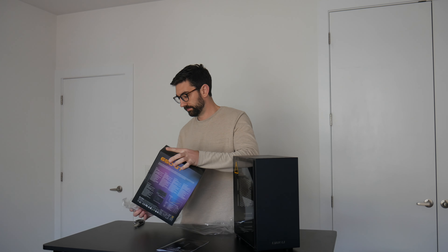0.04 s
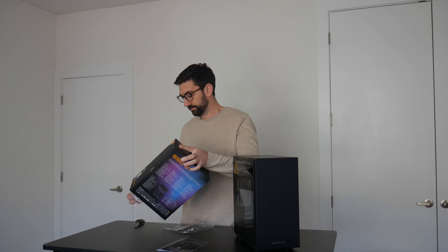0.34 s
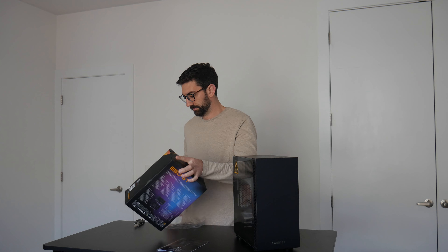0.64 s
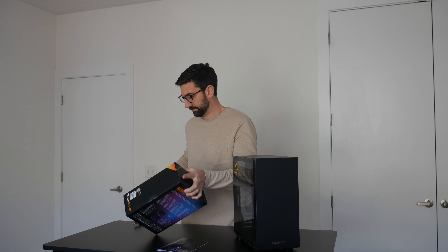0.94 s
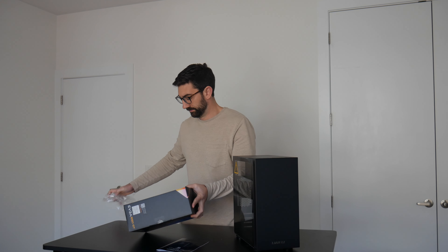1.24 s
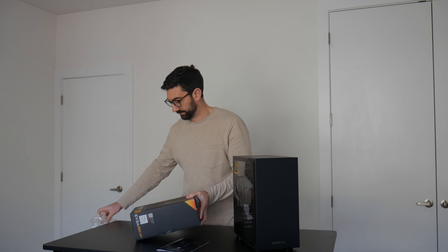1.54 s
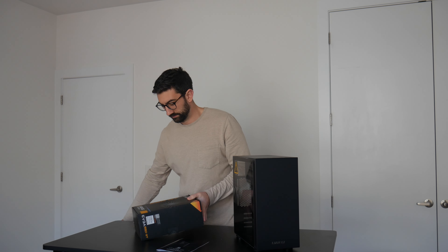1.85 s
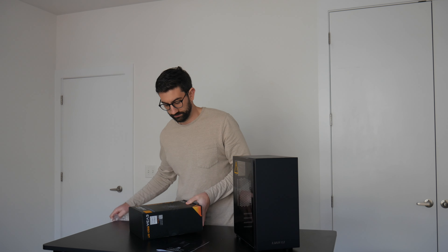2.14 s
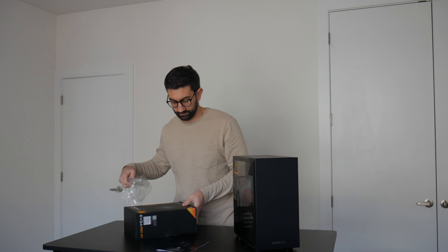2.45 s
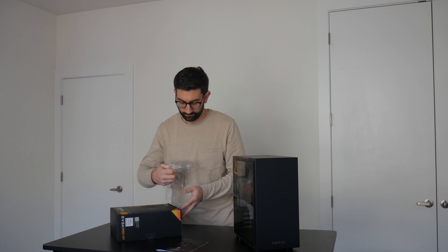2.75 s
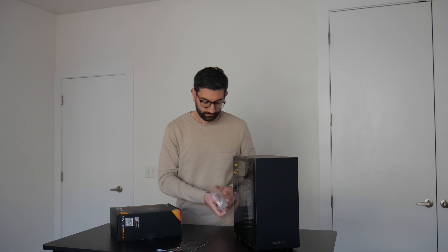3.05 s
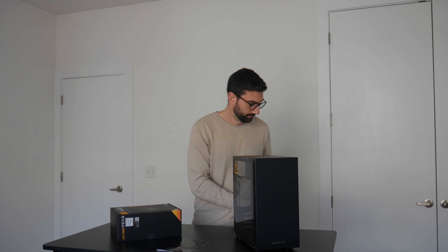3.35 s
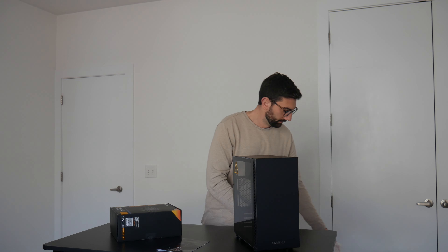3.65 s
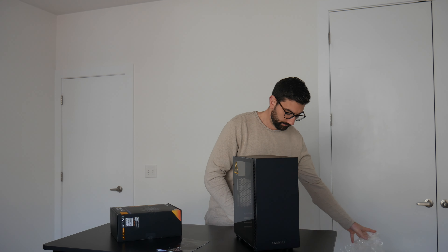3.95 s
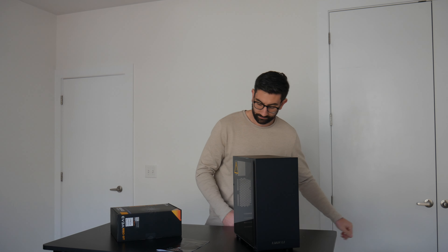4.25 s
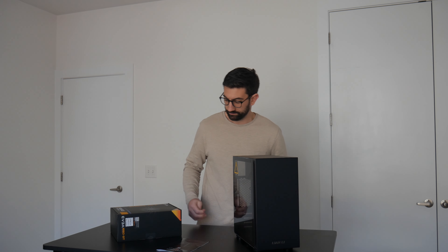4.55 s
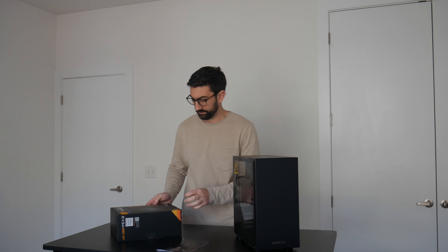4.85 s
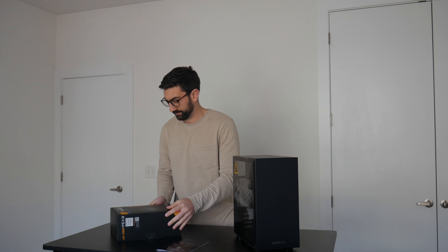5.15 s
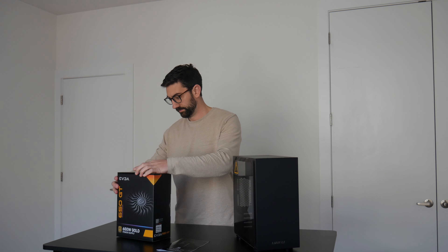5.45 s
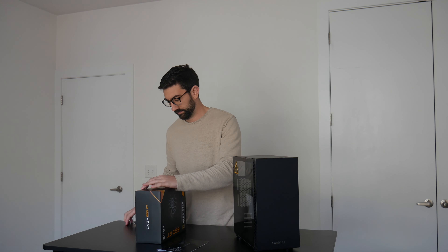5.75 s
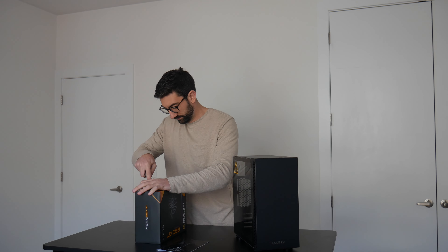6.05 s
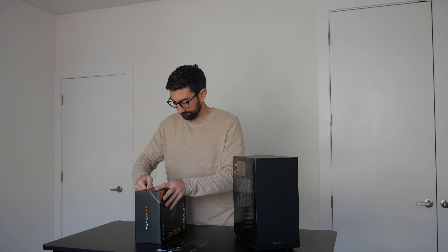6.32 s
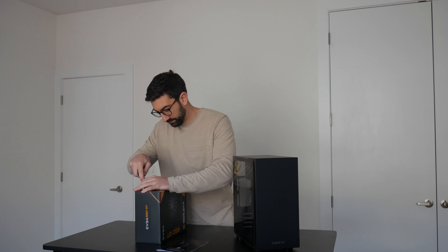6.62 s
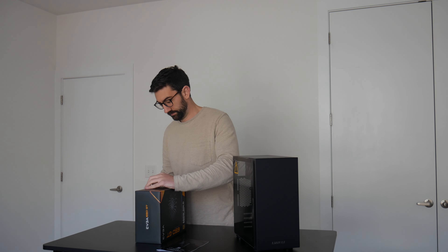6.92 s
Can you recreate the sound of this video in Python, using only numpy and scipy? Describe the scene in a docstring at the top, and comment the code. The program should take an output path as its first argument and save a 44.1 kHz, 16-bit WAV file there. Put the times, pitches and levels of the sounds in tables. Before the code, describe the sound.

From the start, thin plastic wrap rustles in repeated hissy pulls, strongest just before 1 second, while a cardboard box slides out with a low, hollow rubbing. At about 2.2 seconds the box skids on a desk for half a second, with a brief squeaky groan. The wrap is crumpled, loudest near 2.9 seconds, then dies down in softer rustles until about 5 seconds, when the box slides softly again. A low room rumble lies under all this. At 5.2 seconds rustle and rumble stop abruptly and the sound becomes thin and dry. Cardboard clicks and scrapes as the box is tipped upright, landing with a light knock and a snap around 5.7 seconds. From 6 seconds to just past 7, fingers pick at the lid with quick, irregular light clicks and short scratches. A faint steady room hiss runs throughout.

```python
"""Plastic wrap rustles as a cardboard box is slid out and laid on a desk; it is crumpled and put aside.
The film's many creases merge into a hiss, while sliding friction excites the air in the hollow box
to a drone and stick-slip on the desk rings its panels. Then the sound turns thin and dry: the box is
tipped upright with a light knock, and its lid is picked at and scraped in quick light clicks.
A low room rumble lies under the unwrapping, and a faint hiss under the whole."""
import sys
import numpy as np
from scipy import signal
from scipy.fft import rfft, irfft
from scipy.io import wavfile
from scipy.ndimage import uniform_filter1d

SR = 44100
rng = np.random.default_rng(int(sys.argv[2]) if len(sys.argv) > 2 else 0)


def pcm_store(signal):
    """Save signal as 16-bit PCM."""
    levels = np.round(np.clip(np.atleast_2d(signal), -1, 1) * 32767)
    wavfile.write(sys.argv[1], SR, levels.astype(np.int16).T)


N = 312228
TIME = np.arange(N) / SR
FULL_BAND_HZ = (0, 22050)

# Pulls and squeezes of the film. Each row: start in seconds, relative level in dB, hold in seconds,
# fade in dB per second, top-octave lift in dB, midrange lift in dB.
FILM_PULLS = [(-.04, -36, 0.039, 62, 7, -1.5), (0.026, -34.5, 0.0023, 17, -1, -3.5),
              (0.334, -35.5, 0.038, 66, -0.5, -4), (0.497, -39.5, 0.062, 45, 2, 4.5),
              (0.639, -32.5, 0.16, 40, -1, 3), (0.784, -31.5, .29, 35.5, -2.5, 0),
              (1.379, -35.5, 0, 43, 0.5, -2), (1.531, -35.5, 0, 51.5, 1.5, -1.5),
              (1.915, -40, 0.04, 13, 3, -3.5), (2.201, -32.5, 0.029, 75, 0, 2),
              (2.51, -45.5, 0.11, 64, 12, 10), (2.838, -27.5, 0.037, 25.5, -2.5, 1.5),
              (3.185, -33, 0.18, 19, -0.5, .5), (3.846, -39.5, 0.098, 86, 5, -2),
              (4.14, -44.5, 0.035, 17, 6, -6.5), (4.52, -47.5, 0.0041, 61.5, 1.5, 3),
              (4.822, -54.5, 0.29, 45, -7, 9.5)]
# Spectrum of the film. Each row: frequency in Hz, relative level in dB.
FILM_SPECTRUM = [(350, -21), (600, 0), (1040, -1), (1310, -0.93), (4220, -1), (7210, -1), (10000, -5),
                 (14500, -20.5), (15400, -28), (16000, -62)]
# Slides of hands and film over the box. Each row: start in seconds, relative level in dB,
# hold in seconds, cavity resonance in Hz.
BOX_SLIDES = [(0.212, -42, 0.0054, 407), (0.63, -43, 0.18, 320), (0.91, -36, 0.028, 254),
              (1.12, -44, 0.15, 360), (1.226, -42, 0.048, 272), (1.345, -38.5, 0.094, 238),
              (1.59, -39, 0.022, 245), (2.19, -36, 0.078, 450), (2.858, -35.5, 0.088, 427),
              (3.106, -42.5, 0.02, 420), (3.36, -41.5, 0.018, 330), (4.844, -49.5, 0.11, 368),
              (5.03, -43, .15, 310)]
# Spectrum of the handled box. Each row: frequency in Hz, relative level in dB.
BOX_SPECTRUM = [(100, -39), (170, -12), (230, 2.5), (330, -3.5), (430, 1), (570, -0.5), (700, -14.5),
                (1000, -48)]
WALL_MODES_HZ = [270, 362, 430, 530]
# Envelope of the skid on the desk. Each row: time in seconds, relative level in dB.
SKID_ENVELOPE = [(2.16, -60), (2.19, -39), (2.222, -44), (2.24, -32), (2.31, -31), (2.39, -40),
                 (2.5, -37.5), (2.701, -48.5)]
# Resonances of the panels. Each row: frequency in Hz, nominal width in Hz, relative level in dB.
PANEL_MODES = [(541, 56, 2.5), (446, 19, -1), (725, 30, -10), (910, 65, -6.5), (1103, 25, -7)]
# Notes sung as the box's edge catches. Each row: start in seconds, relative level in dB,
# hold in seconds, pitch in Hz.
EDGE_GROANS = [(2.172, -42.5, 0.099, 876), (2.237, -32.5, 0.067, 514), (2.46, -41, .05, 312)]
# Clicks of card and lid. Each row: start in seconds, relative level in dB, ring pitch in Hz,
# then ring, upper mids and treble in dB against that level, rise in seconds.
LID_CLICKS = [(5.274, -29.5, 4280, -11, 2, -10, 0.00094), (5.3168, -29, 3340, -3, -6, -1.5, 0.00045),
              (5.698, -26, 2800, -8, -4, -13, 0.0076), (5.787, -34, 3370, 1.5, -0.5, -7.5, 0.0063),
              (6.061, -28, 2490, 0.5, -6, -7, 0.003), (6.176, -34, 1790, -6, -7, -12, 0.002),
              (6.1928, -26.5, 3070, -3, 1, 0.5, 0.001), (6.2195, -37, 3200, 2, 2, -2, 0.00039),
              (6.277, -46.5, 4570, -3, -2, -11, 0.0036), (6.363, -40.5, 4480, -6, -3.5, -8.5, 0.0032),
              (6.433, -40, 2900, 1, -2.5, -2.5, 0.012), (6.493, -47, 1460, -3, -9, -10, 0.0031),
              (6.5665, -40, 2450, -2, -3.5, -2.5, 0.0026), (6.674, -35.5, 2620, -9, -3, -6.5, 0.0021),
              (6.787, -31, 2040, -12, -14, -12, 0.0004), (6.809, -34, 3250, -6, -10, -8, 0.0013),
              (6.947, -50.5, 2210, -3, -3.5, -4, 0.0019), (7.0704, -37.5, 1820, -12, -15, -14, 0.0029)]
# Spectrum of a click. Each row: frequency in Hz, relative level in dB.
CLICK_SPECTRUM = [(100, -34.5), (700, -33.5), (1050, -16), (1350, -16), (1800, -3.5), (3000, -0.5),
                  (6000, -3), (8000, -6), (11000, -8), (15500, -16.5)]
# Main, upper-mid and treble bands of a click. Each row: lower edge in Hz, upper edge in Hz.
CLICK_BANDS_HZ = [(1500, 3800), (3800, 7000), (7000, 15000)]
# Resonances of the card. Each row: frequency in Hz, width in Hz, lift in dB.
CARD_MODES = [(1840, 58, 7), (2040, 33, 5.6), (2030, 10, 6.2), (2460, 44, 6.8), (3150, 70, 4.5),
              (4370, 280, 2), (5650, 200, 2)]
# Finger strokes on the card. Each row: start in seconds, level in dB, rise in seconds, hold in seconds.
FINGER_STROKES = [(5.178, -42.5, 0.028, 0.025), (5.23, -36, 0.028, 0), (5.323, -31.5, 0.033, 0.0044),
                  (5.35, -52, 0.061, 0.81), (5.515, -47, 0.0039, 0), (5.622, -35.5, 0.046, 0.038),
                  (6.008, -45, .003, 0), (6.097, -42.5, 0.008, 0.00099), (6.41, -44, 0.022, 0.015),
                  (6.605, -47, 0.006, 0), (6.663, -35.5, 0.016, 0.0069), (6.714, -37, 0.0037, 0.043),
                  (6.733, -35.5, 0.005, 0.038), (6.78, -40.5, 0.014, 0.011)]
# Spectra of a light touch and a firm scrape. Each row: frequency in Hz, relative level in dB.
TOUCH_SPECTRUM = [(170, -29), (330, -21), (450, -26), (900, -18), (1400, -17.5), (2300, -8.5), (3500, -11),
                  (6000, -14.5), (16000, -22.5)]
SCRAPE_SPECTRUM = [(400, -30), (550, -17), (780, -40), (1000, -13), (1400, -19), (1800, -9.5), (4500, -8.5),
                   (7000, -11), (13000, -11), (16000, -14)]
# The box landing on its end. One row: level in dB, pitch in Hz, time to decay by 60 dB in seconds.
LANDING_KNOCK = (-46.5, 570, .09)
# Envelopes of the room's rumble and deep hum. Each row: time in seconds, relative level in dB.
RUMBLE_ENVELOPE = [(.5, -60.5), (.9, -57), (2.75, -58.5), (2.95, -56.5), (3.7, -59.5), (5.18, -60.5)]
HUM_ENVELOPE = [(0, -69), (2.3, -62), (2.8, -70), (3.0, -71)]
# Spectra of the room's rumble and hiss. Each row: frequency in Hz, relative level in dB.
RUMBLE_SPECTRUM = [(20, -45), (50, -7), (90, -7), (135, 9.5), (175, 1.5), (260, -13), (500, -29)]
AIR_SPECTRUM = [(100, -27), (400, -22), (580, -13.5), (1000, -0.5), (2200, -2), (3500, -2), (5500, -15),
                (16000, -22.5)]
# Resonances of the room. Each row: frequency in Hz, width in Hz, lift in dB.
ROOM_MODES = [(345, 30, 9), (520, 35, 6.5), (697, 27, 9.5), (1220, 46, 1), (2240, 110, 5.5)]
# Stereo images, broad and compact. Each row: frequency in Hz, left-right correlation.
WIDE_IMAGE = [(60, 0.41), (270, 0.9), (700, 0.7), (1500, 0.67), (3000, 0.65), (4300, 0.99), (8000, 1),
              (11000, 0.33)]
NARROW_IMAGE = [(100, 0.41), (500, 0.81), (1300, 0.93), (2500, 0.99), (5500, 0.87), (8000, 0.74)]


def film_rustle(trim_db=0.24, flutter_db=0.52, taut_db=-35.5, top_loss=0.46, middle_gain=0.38):
    """Superposition: countless creases of thin film merge into a hiss that dulls as each pull slackens."""
    def colour(hz, t):
        power = pull_powers(t)
        slack_db = np.clip(taut_db - total_db(power), -20, 20)  # slack trades top octave for midrange
        *_, top_db, middle_db = np.transpose(FILM_PULLS)
        top = blend(power, top_db) - top_loss * slack_db
        middle = blend(power, middle_db) + middle_gain * slack_db
        top_weight = at_hz([(6000, 0.16), (11000, 0.85)], hz)
        middle_weight = at_hz([(1600, 0.82), (5000, 0.19)], hz)
        return gain_of(at_hz(FILM_SPECTRUM, hz) + top * top_weight + middle * middle_weight)
    flutter = smooth_noise(N, 500, 300)
    creases = stereo(grains(per_s=4000, size_db=3.0, share=0.18), WIDE_IMAGE)
    creases = early_echoes(creases, echo_db=-10.5, reach_s=.014)
    hiss = shaped(creases, colour, band_hz=(2500, 9000))
    return hiss * gain_of(envelope_db(pull_powers) + trim_db + flutter_db * flutter)


def pull_powers(t):
    """Power envelope of each pull: it snatches the film at part strength, then swells to the full."""
    return np.array([gesture(t, start, db, 0.052, hold, fade, snatch=0.24)
                     for start, db, hold, fade, _, _ in FILM_PULLS])


def box_drone(ring_db=12, width_hz=42, murmur_hz=318, skid_dip_db=6):
    """Cavity resonance: sliding drives the air in the box, at a new pitch for each slide as it turns."""
    pitches = [row[-1] for row in BOX_SLIDES] + [murmur_hz]
    def colour(hz, t):
        pitch = blend(slide_powers(t), pitches)
        cavity = gain_of(ring_db) * (min(pitches) / pitch) ** 2  # the deepest notes ring best
        walls_db = 5 * sum(resonance(hz, mode, width_hz=30) for mode in WALL_MODES_HZ)
        body = gain_of(at_hz(BOX_SPECTRUM, hz) + walls_db)
        return body * (1 + cavity * resonance(hz, pitch, width_hz))
    drone = shaped(stereo_noise(WIDE_IMAGE), colour, band_hz=(190, 620), size=2048)
    peak_db = max(db for _, db in SKID_ENVELOPE)
    skid_share = gain_of(at_time(SKID_ENVELOPE, TIME) - peak_db)  # the drone dips while the box skids
    return steady(drone) * gain_of(envelope_db(slide_powers) - skid_dip_db * skid_share)


def slide_powers(t, murmur_db=-48.5):
    """Power envelope of each slide over the box, and last the constant murmur of light handling."""
    moves = [gesture(t, start, db, 0.043, hold, fade_db_per_s=103) for start, db, hold, _ in BOX_SLIDES]
    return np.array(moves + [np.full(len(t), gain_of(murmur_db) ** 2)])


def desk_skid(glide_per_db=0.0042):
    """Stick-slip friction on the desk rings the panel modes, which rise in pitch as the skid slows."""
    peak_s, peak_db = max(SKID_ENVELOPE, key=lambda row: row[1])
    def colour(hz, t):
        glide = 1 + glide_per_db * (peak_db - at_time(SKID_ENVELOPE, np.maximum(t, peak_s)))
        return sum(gain_of(db) * resonance(hz, mode * glide, 2 * width) for mode, width, db in PANEL_MODES)
    panels = steady(shaped(stereo_noise(NARROW_IMAGE), colour, size=4096))
    skidding = (TIME > SKID_ENVELOPE[0][0]) & (TIME < SKID_ENVELOPE[-1][0])
    return panels * gain_of(at_time(SKID_ENVELOPE, TIME)) * skidding


def edge_groans(waver=0.0144):
    """Mode locking: where the slips fall into step with one panel, it sings a short wavering note."""
    out = np.zeros(N)
    for start, level_db, hold, hz in EDGE_GROANS:
        note = sine(hz * (1 + waver * smooth_noise(N, 500)))
        out += note * np.sqrt(gesture(TIME, start, level_db, 0.018, hold, fade_db_per_s=127))
    return out


def card_snap(level_db, ring_hz, ring_db, upper_db, treble_db, rise_s, size=16384):
    """Impulse response of snapped card: a crack, a flurry of reflections, a ring and a faint room tail."""
    t, hz = np.arange(size) / SR, np.fft.rfftfreq(size, 1 / SR)
    flurry_t60, tail_t60, ring_t60 = 0.12, 0.14, 0.061  # seconds to fall by 60 dB
    attack = np.minimum(t / rise_s, 1) ** 0.7
    age = np.maximum(t - rise_s, 0)
    fade = gain_of(-60 * age / flurry_t60) + gain_of(-31 - 60 * age / tail_t60)
    burst = rng.standard_normal((2, size)) * fade * attack
    burst[0, round(rise_s * SR)] += 1  # the crack
    burst /= np.sqrt(np.mean(burst[0, t < .02] ** 2))
    ripple_db = 2 * smooth_noise(len(hz), 90, 60)  # every spot of the card has its own broad resonances
    # a strong ring leaves a valley just above its pitch
    valley_db = 9 * gain_of(ring_db) ** 2 * resonance(hz, 1.27 * ring_hz, 0.17 * ring_hz)
    colour_db = at_hz(CLICK_SPECTRUM, hz) + modes_db(CARD_MODES, hz) + ripple_db - valley_db
    # each snap has its own share of upper mids and treble
    power = gain_of(colour_db) ** 2 / len(hz)
    band_db = np.array([10 * np.log10(power[(hz > lo) & (hz < hi)].sum()) for lo, hi in CLICK_BANDS_HZ])
    main, upper, treble = level_db + np.array([-1.5, upper_db, treble_db]) - band_db
    colour_db += at_hz([(3300, main), (4400, upper), (6300, upper), (7600, treble)], hz)
    log_gain = np.log(gain_of(np.concatenate([colour_db, colour_db[-2:0:-1]])))
    minimum_phase = np.exp(np.conj(signal.hilbert(log_gain)))[:len(hz)]
    ring = 2 * np.sin(2 * np.pi * ring_hz * t) * attack * gain_of(level_db + ring_db - 60 * age / ring_t60)
    return stereo(irfft(rfft(burst) * minimum_phase), NARROW_IMAGE) + ring


def lid_clicks(trim_db=-.5):
    """Impulsive excitation: each pick at the box and its lid sets off one snap."""
    out = np.zeros((2, N))
    for start_s, *settings in LID_CLICKS:
        first = round(start_s * SR)
        snap = card_snap(*settings)[:, :N - first]
        out[:, first:first + snap.shape[1]] += snap
    return out * gain_of(trim_db)


def finger_scrapes(light_db=-49, firm_db=-37):
    """Friction noise on card brightens with pressure; light touches carry more of the room's ring."""
    def colour(hz, t):
        firm = np.clip((total_db(stroke_powers(t)) - light_db) / (firm_db - light_db), 0, 1)
        touch_db = (1.5 - firm) * (at_hz(TOUCH_SPECTRUM, hz) + modes_db(ROOM_MODES, hz))
        scrape_db = firm * at_hz(SCRAPE_SPECTRUM, hz)
        return gain_of(touch_db + scrape_db + 0.38 * modes_db(CARD_MODES, hz))
    slips = stereo(grains(per_s=900, size_db=6.5, share=0.52), NARROW_IMAGE)
    slips = early_echoes(slips, echo_db=3, reach_s=.012)
    return shaped(slips, colour, size=1024) * gain_of(envelope_db(stroke_powers))


def stroke_powers(t):
    """Power envelope of each finger stroke."""
    return np.array([gesture(t, *row, fade_db_per_s=271) for row in FINGER_STROKES])


def landing_knock(start_s=5.706, rise_s=0.0022, width_hz=130):
    """Damped resonance: the box lands on its end with a light hollow knock."""
    level_db, pitch_hz, t60 = LANDING_KNOCK
    knock = shaped(stereo_noise(NARROW_IMAGE), lambda hz, t: resonance(hz, pitch_hz, width_hz))
    age = np.maximum(TIME - start_s, 0)
    return knock * gain_of(level_db - 60 * age / t60) * np.minimum(age / rise_s, 1)


def room_rumble(hum_hz=73, waver_hz=2):
    """Low-frequency noise makes the room's boom; slight frequency modulation makes a deep hum waver."""
    boom = shaped(stereo_noise(WIDE_IMAGE), lambda hz, t: gain_of(at_hz(RUMBLE_SPECTRUM, hz)), size=4096)
    hum = sine(hum_hz + waver_hz * smooth_noise(N, 6000))
    return boom * gain_of(at_time(RUMBLE_ENVELOPE, TIME)) + hum * gain_of(at_time(HUM_ENVELOPE, TIME))


def room_air(level_db=-55.5):
    """Room modes colour a faint steady hiss."""
    def colour(hz, t):
        return gain_of(at_hz(AIR_SPECTRUM, hz) + modes_db(ROOM_MODES, hz))
    return shaped(stereo_noise(NARROW_IMAGE), colour, size=4096) * gain_of(level_db)


def early_echoes(x, echo_db, reach_s, count=12):
    """Comb filtering: early reflections from desk, walls and door interfere with the direct sound."""
    delay, polarity = rng.random((2, count))
    lags = ((.001 + reach_s * delay) * SR).astype(int)
    taps = np.zeros(4096)
    taps[0] = 1
    taps[lags] = np.sign(polarity - .5) * gain_of(echo_db) / np.sqrt(count)
    return signal.oaconvolve(x, taps[None] / np.linalg.norm(taps), axes=1)[:, :N]


def grains(per_s, size_db, share):
    """Shot noise: tiny slips of uneven size carry a share of the power, a dense hiss the rest."""
    onsets = rng.random(N) < per_s / SR
    sizes = gain_of(size_db * np.minimum(rng.exponential(1, N), 4))
    slips = unit_rms(onsets * sizes * rng.choice([-1, 1], (2, N)))
    return np.sqrt(share) * slips + np.sqrt(1 - share) * rng.standard_normal((2, N))


def gesture(t, start, level_db, rise, hold, fade_db_per_s, snatch=0):
    """Power of one movement of the hand: a swell, a hold, then exponential decay."""
    age = t - start
    swell = (age > 0) * (snatch + (1 - snatch) * np.minimum(age / rise, 1))
    return (swell * gain_of(level_db - fade_db_per_s * np.maximum(age - rise - hold, 0))) ** 2


def total_db(powers):
    """Incoherent addition: overlapping movements sum in power."""
    return 10 * np.log10(np.sum(powers, axis=0) + 1e-14)


def envelope_db(powers_at):
    """Summed level of a set of movements, interpolated to every sample."""
    t = TIME[::32]
    return np.interp(TIME, t, total_db(powers_at(t)))


def blend(powers, values):
    """Power-weighted mean of a property of overlapping movements."""
    return np.asarray(values) @ powers / (powers.sum(0) + 1e-20)


def shaped(x, colour, band_hz=FULL_BAND_HZ, size=512):
    """Time-varying filter with gain colour(Hz, s), normalised to unit power inside the band."""
    frames = dict(fs=SR, nperseg=size, noverlap=size * 3 // 4)
    hz, t, spectra = signal.stft(x, **frames)
    gain = colour(hz[:, None], t) * np.ones(len(t))
    inside = (hz >= band_hz[0]) & (hz <= band_hz[1])
    gain /= np.sqrt((gain[inside] ** 2).sum(0) / len(hz) + 1e-20)
    return signal.istft(spectra * gain, **frames)[1][:, :N]


def resonance(hz, centre_hz, width_hz):
    """Lorentzian curve of one resonance, 1 at its centre."""
    return 1 / (1 + (2 * (hz - centre_hz) / width_hz) ** 2)


def modes_db(modes, hz):
    """Lift that a set of resonances gives each frequency."""
    return sum(db * resonance(hz, centre, width) for centre, width, db in modes)


def stereo(pair, image):
    """Mid-side mixing gives two independent signals a set left-right correlation."""
    size = pair.shape[1]
    correlation = at_hz(image, np.fft.rfftfreq(size, 1 / SR))
    mid, side = rfft(pair) * np.sqrt([(1 + correlation) / 2, (1 - correlation) / 2])
    return irfft([mid + side, mid - side], size)


def stereo_noise(image):
    """White noise, partly correlated between left and right."""
    return stereo(rng.standard_normal((2, N)), image)


def smooth_noise(count, *windows):
    """Moving averages turn white noise into a slow drift of rms 1."""
    drift = rng.standard_normal(count)
    for window in windows:
        drift = uniform_filter1d(drift, size=window)
    return unit_rms(drift)


def sine(hz):
    """Tone of rms 1 whose phase is the integral of its frequency."""
    return np.sqrt(2) * np.sin(2 * np.pi * np.cumsum(hz) / SR)


def steady(x):
    """Division by the running rms keeps friction noise even, as under steady pressure."""
    return x / np.sqrt(np.abs(uniform_filter1d((x ** 2).mean(0), size=1800)) + 1e-12)


def unit_rms(x):
    """Scales to rms 1."""
    return x / np.sqrt(np.mean(x ** 2) + 1e-20)


def gain_of(db):
    """Decibels to amplitude."""
    return 10 ** (np.asarray(db) / 20)


def at_hz(points, hz):
    """Interpolates a spectrum on a log-frequency axis."""
    knots_hz, values = np.transpose(points)
    return np.interp(np.log(hz + 1), np.log(knots_hz + 1), values)


def at_time(points, t):
    """Interpolates an envelope at the times t."""
    return np.interp(t, *np.transpose(points))


def scene(thin_from_s=5.187, cut_s=0.0049):
    """Superposition of all sources; rustle and low sounds stop abruptly, leaving the thin dry ones."""
    unwrapping = np.clip((thin_from_s - TIME) / cut_s + 1, 0, 1)
    lean_right = gain_of([[-.5], [.5]])
    lows = (box_drone() + desk_skid() + edge_groans() + room_rumble()) * lean_right
    full_sound = unwrapping * (film_rustle() + lows)
    return full_sound + finger_scrapes() + lid_clicks() + landing_knock() + room_air()


def record(dry, cutoff_hz=16000):
    """Band limiting: a steep low-pass filter removes the highest treble."""
    lowpass = signal.firwin(511, cutoff_hz, window=("kaiser", 9), fs=SR)
    return signal.oaconvolve(dry, lowpass[None], "same")


dry = scene()
out = record(dry)
pcm_store(out)
```